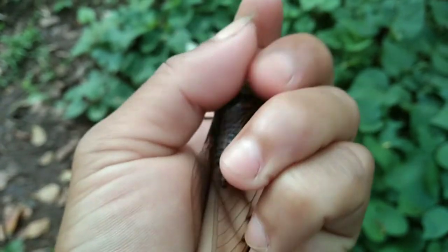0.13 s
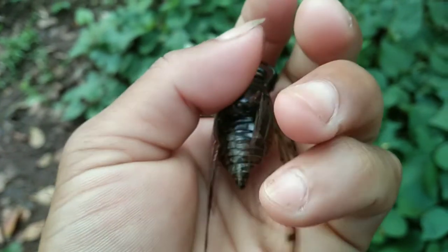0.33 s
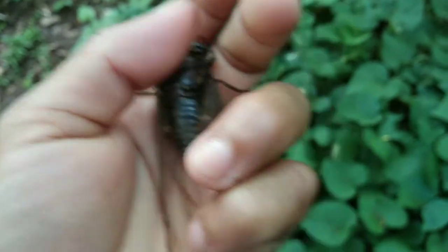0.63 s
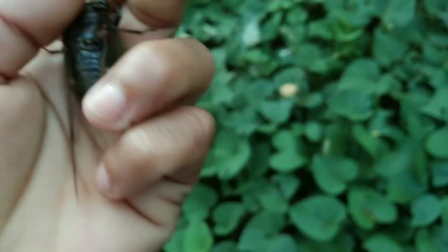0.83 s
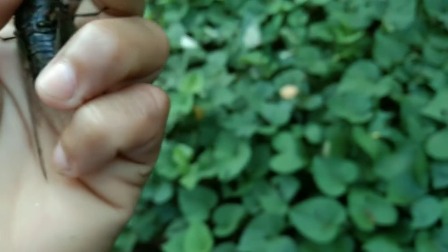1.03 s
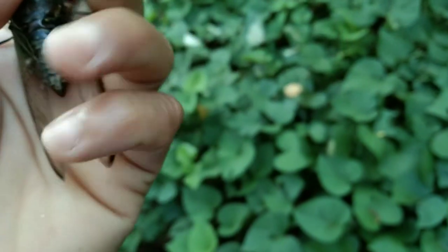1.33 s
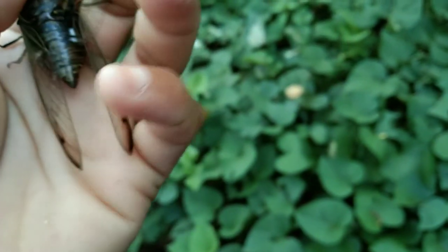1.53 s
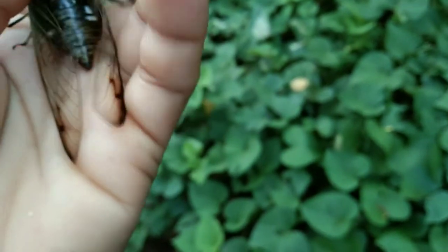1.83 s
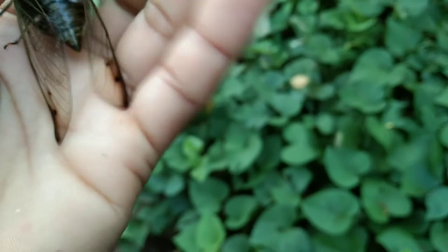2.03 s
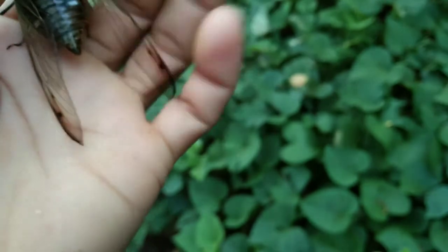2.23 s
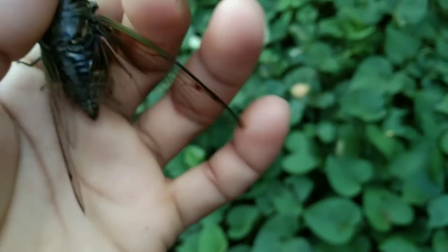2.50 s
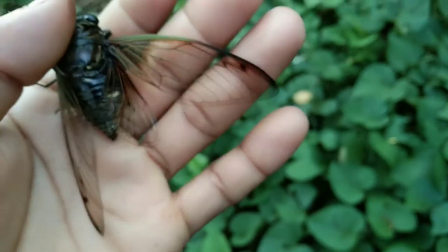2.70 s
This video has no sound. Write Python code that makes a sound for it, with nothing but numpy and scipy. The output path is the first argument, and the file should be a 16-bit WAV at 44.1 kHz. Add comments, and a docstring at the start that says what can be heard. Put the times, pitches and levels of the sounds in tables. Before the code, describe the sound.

Constant shrill cicada drone outdoors, slightly echoing; close wing snaps come early, mid-way and near the end, with scratchy finger scrapes, sharp high chirps, a faint bird whistle and soft handling bumps on the microphone.

```python
"""A dense cicada chorus drones in the trees: jittered click trains, coloured, smeared and flickering.
Around it noise bands and ringing clicks pulse, rasp and chirp as other insects, and sines whistle as a far bird.
Close by, a held cicada flicks its wings (struck resonances, bright snaps) and scrapes the fingers (noisy grains).
A moving hiss band sounds through the hollow of the hand. Under it lie airy noise, a rumble,
a far motor's wavering tones and soft bumps of the hand on the camera."""
import sys
import numpy as np
from scipy import signal
from scipy.fft import rfft, irfft
from scipy.io import wavfile
from scipy.ndimage import uniform_filter1d, map_coordinates

SR = 44100
rng = np.random.default_rng(int(sys.argv[2]) if len(sys.argv) > 2 else 0)


def inscribe(sig):
    """Save sig as 16-bit PCM at rate SR to the path in sys.argv[1].

    A 1-D sig is mono; a 2-D sig holds one channel per row.
    Samples are clipped to [-1, 1] before scaling.
    """
    pcm = np.round(np.clip(np.atleast_2d(sig).T, -1, 1) * 32767)
    wavfile.write(sys.argv[1], SR, pcm.astype(np.int16))


N = 126126
T = np.arange(N) / SR


def undb(db):
    """Decibels to gain."""
    return 10 ** (np.asarray(db) / 20)


def unit(x):
    """Scale to rms 1."""
    return x / np.sqrt(np.mean(x ** 2) + 1e-20)


def noise():
    """White noise."""
    return rng.standard_normal(N)


def curve(rows):
    """Gain over time from (t/s, level/dB) points."""
    return undb(np.interp(T, *np.array(rows).T))


def colour(x, points):
    """Shape a spectrum by (f/Hz, level/dB) points, falling away steeply below the first."""
    hz, db = np.array(points, float).T
    f = np.maximum(np.arange(N // 2 + 1) * SR / N, 1)
    gain = undb(np.interp(np.log(f), np.log(hz), db))
    low_cut = np.minimum(f / hz[0], 1) ** 6
    return irfft(rfft(x) * gain * low_cut, N)


def ring(x, hz, width_hz):
    """A resonance applied twice, for steep skirts."""
    b, a = signal.iirpeak(hz, hz / width_hz, fs=SR)
    return signal.lfilter(b, a, signal.lfilter(b, a, x))


def band(hz, width_hz):
    """A narrow, steep-sided hiss whose centre may move: low-passed noise shifted up to pitch."""
    low_pass = signal.butter(3, width_hz / 2, fs=SR, output="sos")
    low = signal.sosfilt(low_pass, noise() + 1j * noise())
    return unit(np.real(low * np.exp(2j * np.pi * np.cumsum(hz) / SR)))


def walk(rate):
    """Smooth random drift of rms near 1, with about `rate` new values a second."""
    k = max(int(SR / rate), 2)
    steps = np.repeat(rng.standard_normal(N // k + 2), k)
    smooth = uniform_filter1d(uniform_filter1d(steps, k), k)
    return unit(smooth[rng.integers(k):][:N])


def swell(start, length):
    """A rounded rise and fall."""
    return np.sin(np.pi * np.clip((T - start) / length, 0, 1))


def clicks(rate_hz, jitter, scatter_db):
    """A train of clicks, uneven in timing and strength."""
    phase = rng.random() + np.cumsum(rate_hz * (1 + jitter * walk(rate_hz / 2))) / SR
    starts = np.diff(np.floor(phase), prepend=0) > 0
    return starts * undb(scatter_db * noise())


def smear(x, wet_db):
    """Clicks plus a formless wash of echoes: noise that follows their energy over 90 ms."""
    energy = uniform_filter1d(x ** 2, int(0.09 * SR))
    wash = np.sqrt(np.maximum(energy, 0)) * noise()
    return x + undb(wet_db) * wash


def waver(x, share):
    """Let the pitch of a sound drift by a small share, by warping its time."""
    return map_coordinates(x, [np.arange(N) + np.cumsum(share * walk(12))], mode="mirror")


def shimmer(x, count=24):
    """Each narrow band of the drone flickers on its own."""
    depth_db, rate_per_s = 1.6, 25
    spectrum, f = rfft(x), np.arange(N // 2 + 1) * SR / N
    centres = np.linspace(4000, 11000, count)  # Hz
    out = 0
    for own in np.eye(count):
        one_band = irfft(spectrum * np.interp(f, centres, own), N)
        out = out + one_band * undb(depth_db * walk(rate_per_s))
    return out


def trees(x, wet_db):
    """Direct sound plus a decaying noise tail scattered by trunks and leaves."""
    t60_s = 0.39
    tail = noise() * undb(-60 * T / t60_s)
    # a mirrored lead-in lets the tail already sound at the start
    wet = signal.fftconvolve(np.concatenate([x[::-1], x]), tail / np.linalg.norm(tail))[N:2 * N]
    return (x + undb(wet_db) * wet) / np.hypot(1, undb(wet_db))


def open_air():
    """Open air as a gently fluctuating coloured hiss."""
    # air spectrum (f/Hz, relative density/dB per Hz)
    air_colour = [(300, -9), (650, 3), (1000, -2), (1600, 4.5), (2200, 5.5), (4000, 9.5), (11000, -35)]
    return undb(-74) * unit(colour(noise(), air_colour) * undb(2.9 * walk(10.25)))


def low_rumble():
    """Low noise that swells slowly and flutters a little."""
    # rumble spectrum (f/Hz, relative density/dB per Hz)
    rumble_colour = [(20, -15), (38, -19), (52, -6), (90, 2.5), (140, 0.5), (200, -5.5), (320, -23.5),
                     (600, -36), (2000, -70)]
    # slow course of the rumble (t/s, level/dB)
    rumble_level = [(0, -62), (.3, -61), (.9, -61.5), (1.25, -60.5), (1.5, -63), (1.95, -58.5),
                    (2.3, -60.5), (2.85, -66)]
    return curve(rumble_level) * unit(colour(noise(), rumble_colour) * undb(1.56 * walk(11.0)))


def far_motor():
    """A far motor hums in low tones that waver in pitch and strength."""
    # motor tones (f/Hz, level/dB)
    motor_tones = [(92, -68.5), (123, -62.5)]
    out = 0
    for hz, db in motor_tones:
        tone = np.sin(2 * np.pi * np.cumsum(hz * (1 + .025 * walk(15))) / SR)
        out = out + undb(db) * unit(tone * undb(3.2 * walk(11)))
    return out


def handling():
    """Clustered dull knocks, damped low thuds and ringing shell modes through the camera body."""
    # bumps of the hand (start/s, length/s, level/dB)
    bumps = [(0.694, 0.12, -59), (0.973, 0.05, -56.5), (2.325, 0.15, -59.5), (2.623, 0.15, -61)]
    # bump spectrum (f/Hz, relative density/dB per Hz)
    bump_colour = [(20, -32), (50, -19), (85, 7.5), (160, -5.5), (290, -4.5), (440, -20), (600, -31),
                   (1400, -30), (2500, -36), (8000, -84)]
    # soft thuds of the grip shifting (t/s, peak level/dB)
    thuds = [(0.721, -52), (0.976, -54), (1.014, -44.5), (1.075, -48), (1.249, -51.5), (1.799, -52),
             (1.96, -49), (2.162, -65)]
    # finger taps (t/s, level/dB, pitch factor)
    taps = [(0.981, -60.5, 0.93), (1.014, -62, 1.1)]
    # ringing modes of the shell (f/Hz before the pitch factor, relative level/dB, t60/s)
    shell = [(442, 2, .13), (767, -8, 0.12), (1000, -3.5, 0.12), (1170, -9.5, 0.18)]
    thud_hz, thud_rise_s, tap_rise_s = 81, 0.012, 0.0037

    knocks = smear(clicks(65, jitter=0.27, scatter_db=1.0), wet_db=3)
    bump_gain = sum(undb(db) * swell(s, length) for s, length, db in bumps)
    out = unit(colour(knocks, bump_colour)) * bump_gain
    for s, db in thuds:
        age = np.maximum(T - s, 0)
        envelope = age / thud_rise_s * np.exp(1 - age / thud_rise_s)
        out = out + undb(db) * envelope * np.sin(2 * np.pi * thud_hz * age)
    for s, db, pitch in taps:
        age = np.maximum(T - s, 0)
        onset = 1 - np.exp(-age / tap_rise_s)
        for hz, mode_db, t60 in shell:
            decay = np.exp(-np.log(1000) * age / t60)
            out = out + undb(db + mode_db) * onset * decay * np.sin(2 * np.pi * pitch * hz * age)
    return out


def scattered_notes(lo_hz, hi_hz, scatter_db, count):
    """Short gliding notes at random times and pitches."""
    note_s = 0.036  # each note lasts 0.5 to 1.5 times this
    out = np.zeros(N + SR)
    for when, pitch, length, glide, size in rng.random((count, 5)):
        u = np.linspace(0, 1, int(SR * note_s * (.5 + length)))
        hz = (lo_hz + pitch * (hi_hz - lo_hz)) * (1 + 0.096 * (glide - .5) * u)
        note = np.sin(np.pi * u) * np.sin(2 * np.pi * np.cumsum(hz) / SR)
        i = int(when * N)
        out[i:i + len(u)] += undb(scatter_db * (2 * size - 1.5)) * note
    return trees(out[:N], wet_db=-11.5)


def far_notes():
    """Remote chirping below the chorus, and fainter wavering blips lower still."""
    chirping = scattered_notes(2300, 3700, scatter_db=1.0, count=50)
    chirping = chirping + undb(-3.5) * scattered_notes(1900, 2350, scatter_db=9.0, count=24)
    blips = scattered_notes(712, 2000, scatter_db=7.0, count=130)
    blips = blips + undb(-2.0) * scattered_notes(246, 606, scatter_db=-0.5, count=24)
    return undb(-61.5) * chirping + undb(-75.5) * blips * undb(2 * walk(150))


def remote_group(hz, width_hz):
    """One group of remote insects: a hiss band that swells, fades and drifts in pitch."""
    swell_db, drift = 3.5, .015
    return unit(band(hz * (1 + drift * walk(9)), width_hz) * undb(swell_db * walk(11.8)))


def remote_insects():
    """Remote insects merge into humming bands, each wandering on its own."""
    # steady part of the hum (centre f/Hz, width/Hz, level/dB)
    remote_bands = [(2537, 114, -77.5), (2840, 230, -71), (4127, 440, -62.5), (4470, 490, -59)]
    # level of the 3-4 kHz part (t/s, level/dB)
    middle_level = [(0, -60.5), (.3, -54.5), (.37, -62), (.44, -77), (.51, -82), (.535, -60), (.85, -71),
                    (.92, -52.5), (1.03, -62), (1.15, -61), (1.22, -77), (1.335, -78), (1.355, -69),
                    (1.45, -67), (1.64, -76), (1.95, -63), (2.3, -64), (2.7, -58), (2.85, -71)]
    hum = sum(undb(db) * remote_group(hz, width) for hz, width, db in remote_bands)
    middle = unit(sum(remote_group(hz, 223) for hz in [3037, 3275, 3573, 3820]))
    return hum + curve(middle_level) * middle


def bird():
    """Thin whistles and short notes from far in the trees: level sines with a slight tremble."""
    # whistles (start/s, length/s, f/Hz, level/dB)
    whistles = [(0.118, 0.11, 1517, -72), (0.236, .2, 2777, -58.5), (0.976, 0.33, 3560, -66),
                (1.925, .04, 1625, -73.5), (1.952, 0.037, 1110, -76), (1.986, 0.43, 3553, -57.5),
                (2.123, 0.059, 2006, -77), (2.18, 0.048, 900, -71), (2.386, 0.037, 1740, -66)]
    song = 0
    for s, length, hz, db in whistles:
        tone = np.sin(2 * np.pi * np.cumsum(hz * (1 + 0.00417 * walk(90))) / SR)
        song = song + undb(db) * swell(s, length) * tone
    return np.sqrt(2) * trees(song * undb(2 * walk(59.83)), wet_db=-9.5)


def pulser():
    """An insect pulsing about seven times a second, each pulse a hiss band falling in pitch."""
    # pulses (centre t/s, level/dB)
    pulses = [(0.029, -49), (.16, -54), (.3, -51.5), (.44, -49), (.575, -49), (0.719, -49), (.87, -54),
              (1.0, -51), (1.15, -48.5), (1.31, -52), (1.458, -49.5), (1.59, -51.5), (1.77, -52.5),
              (1.87, -48.5), (2.03, -50), (2.55, -49.5)]
    centre_hz, width_hz, fall_hz_per_s, pulse_s = 4950, 325, 2700, 0.095
    out = 0
    for s, db in pulses:
        hiss = band(centre_hz - fall_hz_per_s * (T - s), width_hz)
        out = out + undb(db) * swell(s - pulse_s / 2, pulse_s) * hiss
    return out


def calls(rows, width_hz, wet_db):
    """Short bursts of fast clicks ringing an insect's body."""
    out = 0
    for s, length, hz, db in rows:
        song = unit(ring(clicks(600, jitter=.3, scatter_db=1.4), hz, width_hz))
        out = out + undb(db) * swell(s, length) * song
    return trees(out, wet_db)


def rasper():
    """Rasping calls: click bursts through a body resonance, with some echo from the trees."""
    # rasps (start/s, length/s, f/Hz, level/dB)
    rasps = [(.23, 0.17, 5630, -47.5), (.59, 0.11, 5580, -45), (1.52, 0.18, 5640, -47.5),
             (1.76, 0.13, 5650, -45), (1.98, 0.091, 5540, -50), (2.71, 0.12, 5670, -45.5)]
    return calls(rasps, width_hz=270, wet_db=-13)


def chirper():
    """High chirps, about four a second: click bursts through a higher body resonance."""
    # chirps (start/s, length/s, f/Hz, level/dB)
    chirps = [(.895, 0.066, 8350, -42), (1.18, 0.082, 8600, -53), (1.42, 0.098, 8170, -38.5),
              (1.67, 0.066, 8040, -36.5), (1.905, 0.047, 8520, -43.5), (2.16, 0.072, 8480, -43)]
    return calls(chirps, width_hz=300, wet_db=-27)


def buzzer():
    """One cicada with a steady, very high buzz: noise gated 94 times a second through a resonance."""
    phase = 2 * np.pi * np.cumsum(94 * (1 + 0.0062 * walk(5.5))) / SR
    gate = (.5 + .5 * np.cos(phase)) ** 2
    return undb(-57.5) * unit(ring(gate * noise(), hz=9890, width_hz=150))


def hand_hollow():
    """Hiss through the hollow of the moving hand: a noise band whose resonance and level move."""
    # level and moving resonance of the hollow (t/s, level/dB, f/Hz)
    hollow_course = [(0, -70, 2650), (0.252, -64.5, 2683), (0.449, -75, 2450), (.53, -61.5, 2320),
                     (0.641, -66.5, 2220), (.8, -58.5, 2460), (1.099, -70, 2417), (1.32, -81, 2577),
                     (1.36, -66, 2460), (1.7, -70.5, 2590), (2.199, -79, 2636), (2.329, -62, 2890),
                     (2.44, -67, 2660), (2.54, -63, 2426), (2.699, -79, 2424), (2.85, -71, 2530)]
    s, db, hz = np.array(hollow_course).T
    return undb(np.interp(T, s, db)) * band(np.interp(T, s, hz), width_hz=330)


def wing_scrape():
    """Dense tiny catches of wings and legs on the fingers: random grains of uneven strength."""
    # scrape spectrum (f/Hz, relative density/dB per Hz)
    scrape_colour = [(1000, -17.5), (2000, -18), (2700, 3.5), (3200, 7.5), (4500, 8), (8000, 10),
                     (11500, -8.5), (15000, -31)]
    # course of the scraping (t/s, level/dB)
    scrape_level = [(0, -46.5), (.24, -47.5), (.33, -64), (.42, -72), (.6, -50.5), (.69, -44), (.82, -52.5),
                    (.93, -55), (1.22, -85), (1.335, -83), (1.355, -47.5), (1.55, -82), (1.95, -79),
                    (2.3, -56.5), (2.45, -48), (2.65, -50.5), (2.85, -74)]
    grains_per_s, scatter_db = 1000, 4
    catches = (rng.random(N) < grains_per_s / SR) * rng.choice([-1, 1], N)
    strength = undb(scatter_db * np.minimum(rng.exponential(size=N), 4))
    return unit(colour(catches * strength, scrape_colour)) * curve(scrape_level)


def wing_flicks():
    """Each flick is a bright noisy snap and a brief papery ring of the wing."""
    # flicks (t/s, body level before the low cut/dB, body f/Hz, body width/Hz, snap level before colour/dB)
    flicks = [(.1195, -35, 3250, 900, -42), (.1266, -34, 3700, 1500, -18), (.1338, -38, 4200, 1500, -9.5),
              (.1352, -33, 3300, 900, -45), (.196, -41, 3100, 800, -30), (.2055, -33, 3100, 800, -48),
              (.2098, -39, 3050, 700, -50), (.2325, -40, 3000, 900, -50), (.2358, -38, 3300, 900, -46),
              (.521, -39, 2900, 800, -48), (.5245, -32, 2950, 900, -39), (.653, -38, 3200, 1200, -41),
              (.661, -35, 3000, 700, -39), (.682, -39, 3300, 1200, -29), (.725, -45, 3000, 1200, -32),
              (1.3495, -37, 3700, 1100, -34), (2.188, -38, 3400, 600, -48), (2.348, -36.5, 2950, 700, -40),
              (2.392, -26.5, 4700, 1300, -29), (2.459, -40, 3700, 1200, -33), (2.5805, -38, 3400, 800, -31),
              (2.6495, -37, 3400, 1600, -31)]
    # snap spectrum (f/Hz, relative density/dB per Hz)
    snap_colour = [(2500, -42), (3000, -25), (5000, -11), (7500, 0), (9500, -7), (11500, -20), (15500, -27)]
    rustle_db, rustle_decay_s, snap_decay_s = -9, .003, .0007
    body, snaps = np.zeros(N), np.zeros(N)
    age = T[:SR // 20]
    for s, db, hz, width, snap_db in flicks:
        start = int(s * SR)
        at = slice(start, start + len(age))
        paper, crack = rng.standard_normal((2, len(age)))
        tick = ring(signal.unit_impulse(len(age)), hz, width)
        rustle = undb(rustle_db) * np.exp(-age / rustle_decay_s) * unit(ring(paper, hz, 2 * width))
        body[at] += undb(db) * (tick / np.abs(tick).max() + rustle)
        snaps[at] += undb(snap_db) * np.exp(-age / snap_decay_s) * np.sign(crack)
    low_cut = signal.butter(10, 2550, "high", fs=SR, output="sos")
    return signal.sosfilt(low_cut, body) + np.sqrt(2) * colour(snaps, snap_colour)


def chorus(count=8):
    """Cicada tymbals click and throb at their own rates; a few near singers stand out by their pitch."""
    # spectrum of the far chorus (f/Hz, relative density/dB per Hz)
    chorus_colour = [(4000, -32.5), (4400, -24), (4900, -14), (5400, -14.5), (5950, -20.5), (6300, -8),
                     (6570, -1.5), (6900, -2), (7170, -6.5), (7470, 0.5), (7950, 0.5), (8300, -12.5),
                     (8750, -22.5), (9300, -13), (9900, -10.5), (10500, -18.5), (11100, -48), (15000, -98)]
    # course of the far chorus (t/s, level before the trim/dB)
    chorus_level = [(0, -34), (.4, -34.5), (.85, -35), (.96, -33), (1.07, -34.5), (1.46, -34),
                    (1.65, -34.5), (1.81, -33), (1.9, -34), (2.4, -34.5), (2.85, -35.5)]
    # nearest singers (f/Hz, width of each resonance pass/Hz, level/dB)
    singers = [(6095, 80, -54.5), (6570, 74, -48.5), (6950, 88, -46.5), (7560, 200, -43), (7910, 180, -51)]
    tymbal_hz, scatter_db, trim_db = 209.44, 1.5, -0.69
    crowd = 0
    for _ in range(count):
        tymbal = clicks(tymbal_hz * rng.uniform(.7, 1.4), .12, scatter_db)
        crowd = crowd + tymbal * undb(1 * walk(15))  # 1 dB throb
    drone = unit(shimmer(colour(smear(crowd, wet_db=1.5), chorus_colour)))
    out = drone * curve(chorus_level) * undb(trim_db)
    for hz, width, db in singers:
        song = ring(smear(clicks(tymbal_hz, .3, scatter_db), wet_db=6.5), hz, width)
        out = out + undb(db) * unit(waver(song, share=.006) * undb(1.5 * walk(14)))
    return out


def scene():
    """Everything at one microphone."""
    background = open_air() + low_rumble() + far_motor() + handling()
    far = remote_insects() + far_notes() + bird()
    insects = pulser() + rasper() + chirper() + buzzer() + chorus()
    in_the_hand = hand_hollow() + wing_scrape() + wing_flicks()
    return (background + far + insects + in_the_hand)[None]


def record(dry):
    """The recorder cuts the top, steeply above 15.7 kHz."""
    return signal.sosfilt(signal.ellip(10, .1, 80, 15700, fs=SR, output="sos"), dry)


dry = scene()
out = record(dry)
inscribe(out)
```